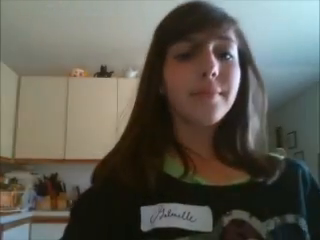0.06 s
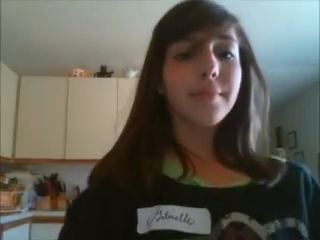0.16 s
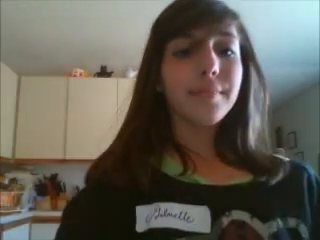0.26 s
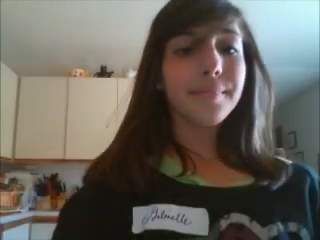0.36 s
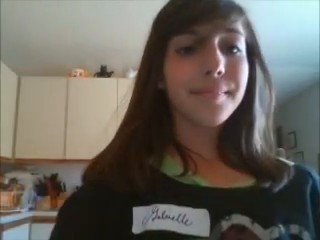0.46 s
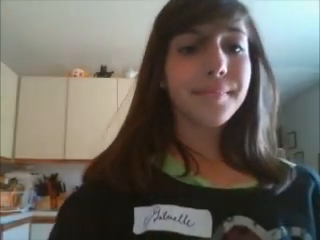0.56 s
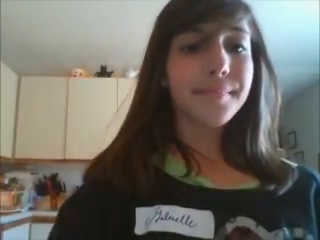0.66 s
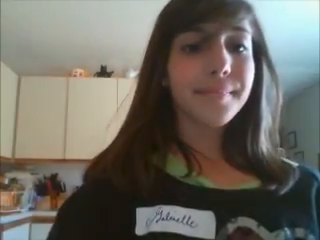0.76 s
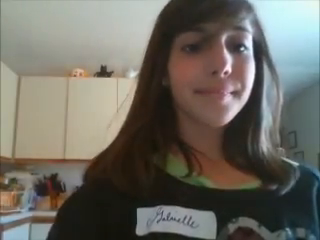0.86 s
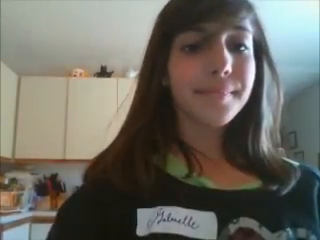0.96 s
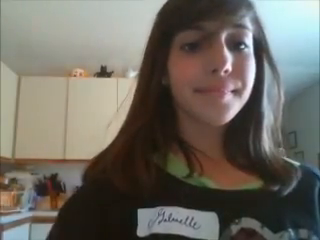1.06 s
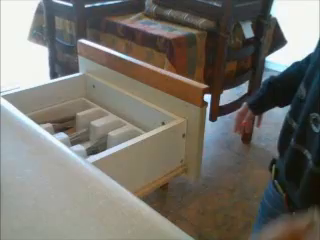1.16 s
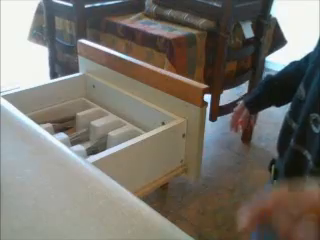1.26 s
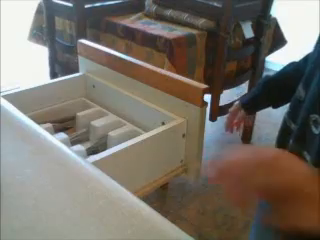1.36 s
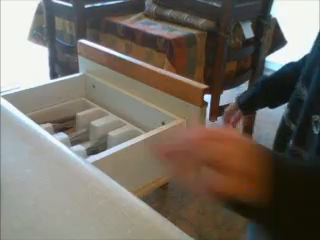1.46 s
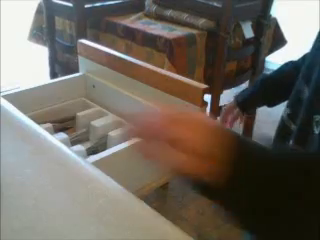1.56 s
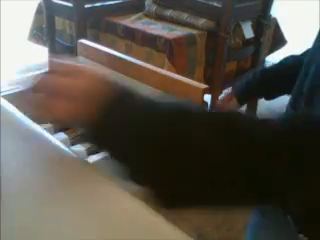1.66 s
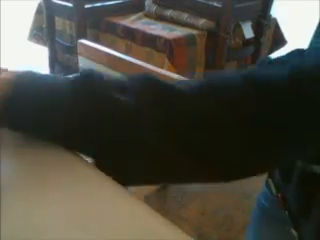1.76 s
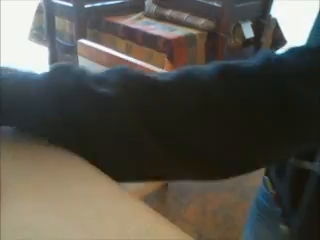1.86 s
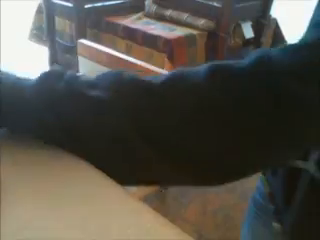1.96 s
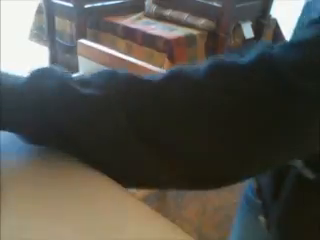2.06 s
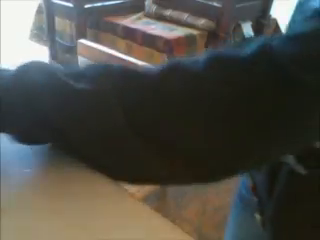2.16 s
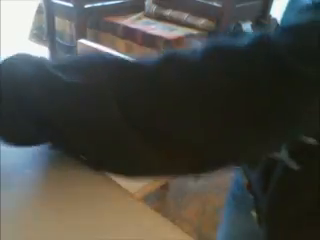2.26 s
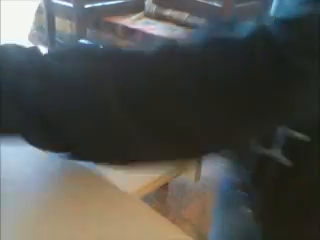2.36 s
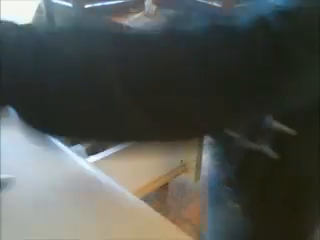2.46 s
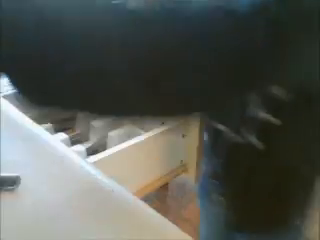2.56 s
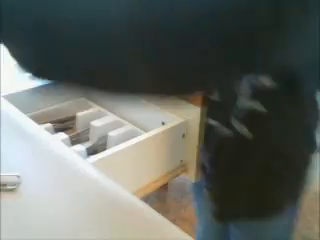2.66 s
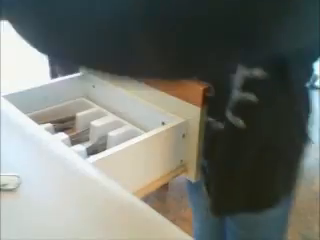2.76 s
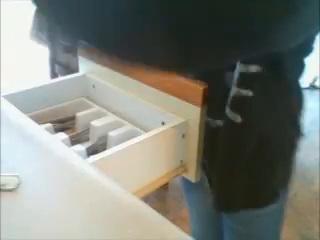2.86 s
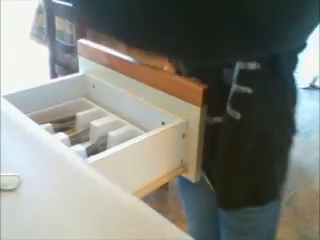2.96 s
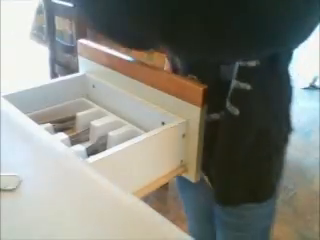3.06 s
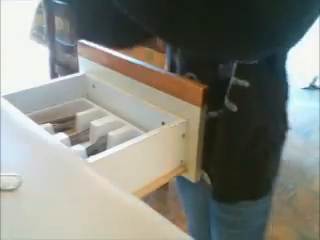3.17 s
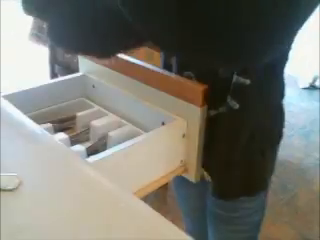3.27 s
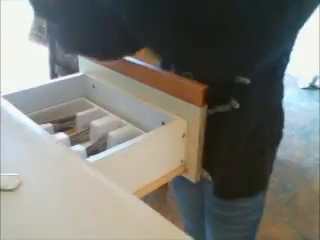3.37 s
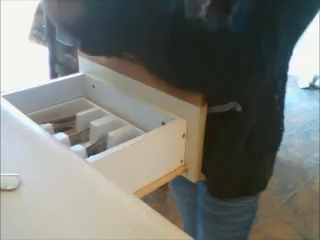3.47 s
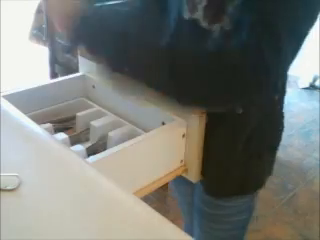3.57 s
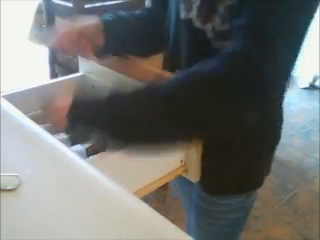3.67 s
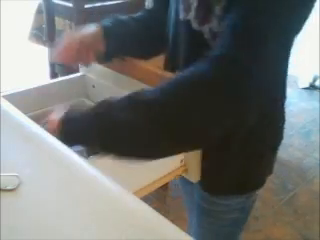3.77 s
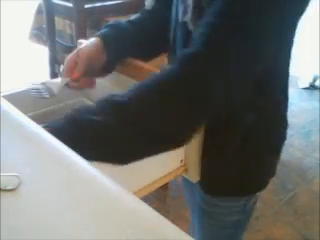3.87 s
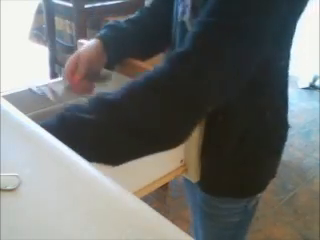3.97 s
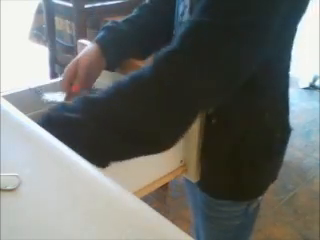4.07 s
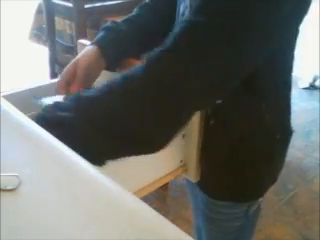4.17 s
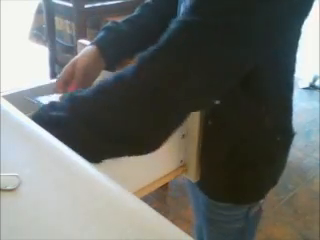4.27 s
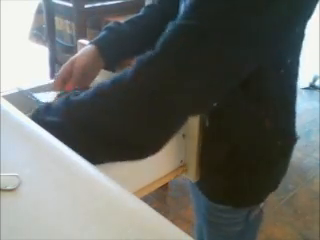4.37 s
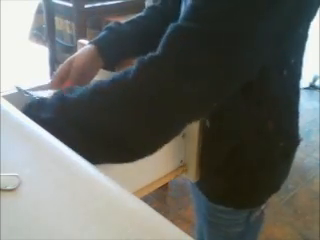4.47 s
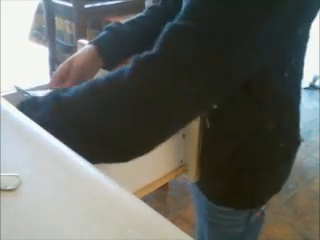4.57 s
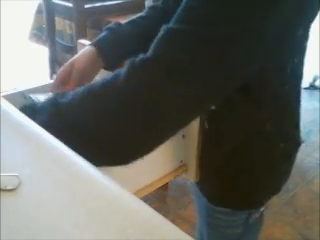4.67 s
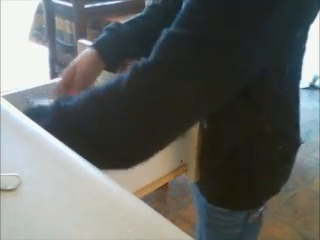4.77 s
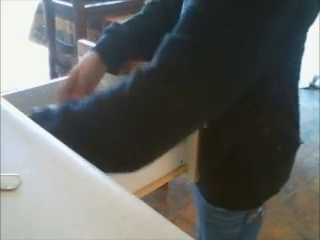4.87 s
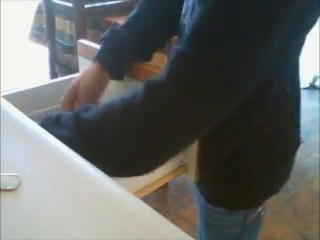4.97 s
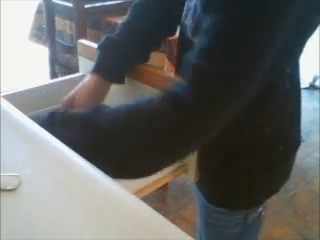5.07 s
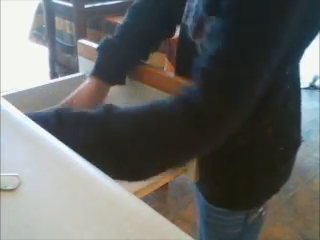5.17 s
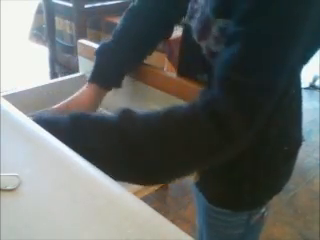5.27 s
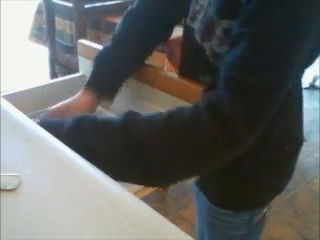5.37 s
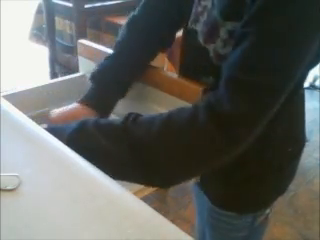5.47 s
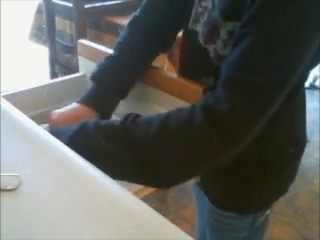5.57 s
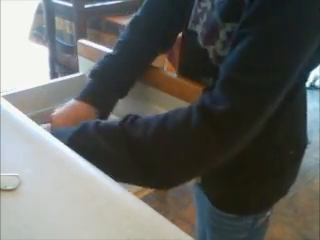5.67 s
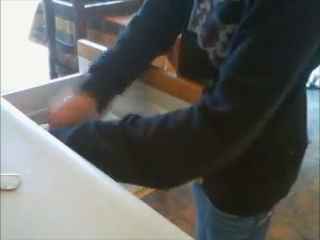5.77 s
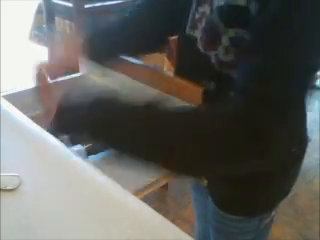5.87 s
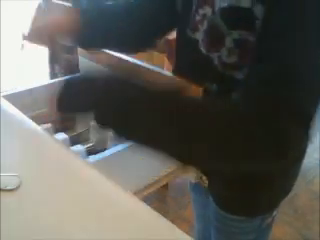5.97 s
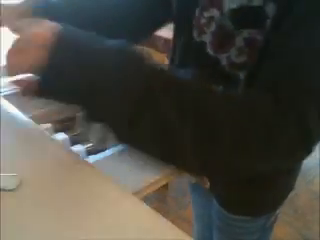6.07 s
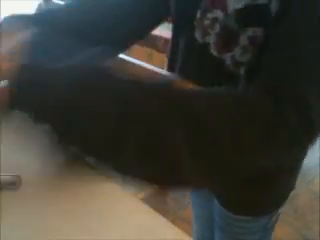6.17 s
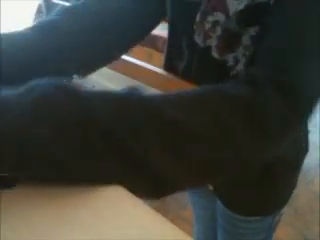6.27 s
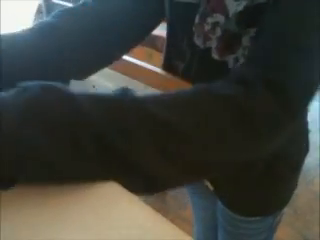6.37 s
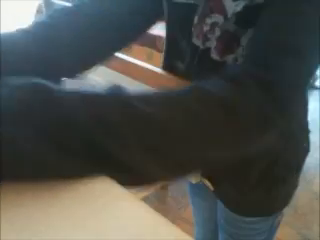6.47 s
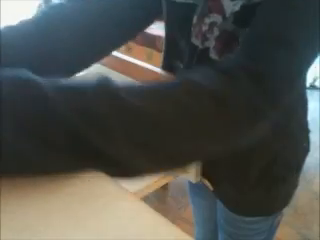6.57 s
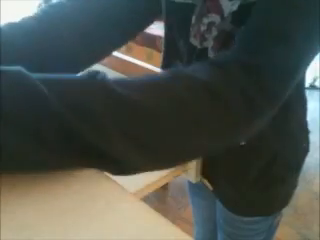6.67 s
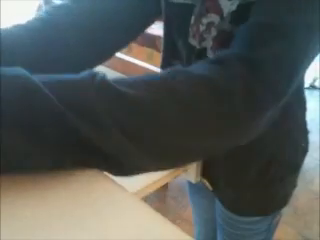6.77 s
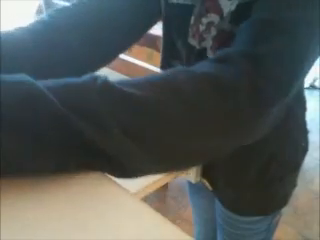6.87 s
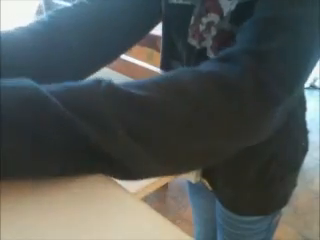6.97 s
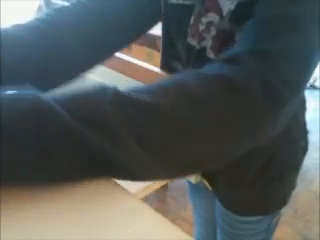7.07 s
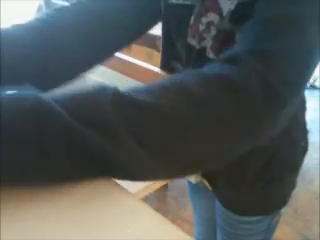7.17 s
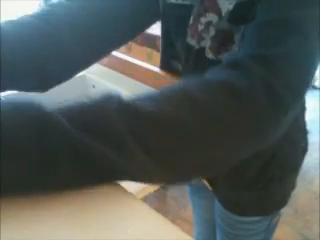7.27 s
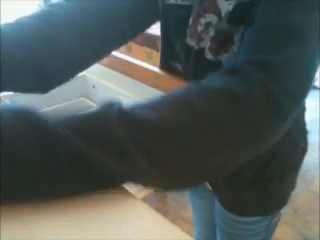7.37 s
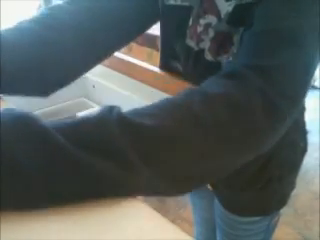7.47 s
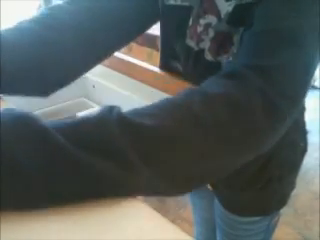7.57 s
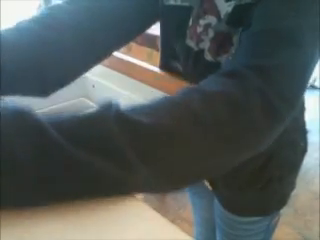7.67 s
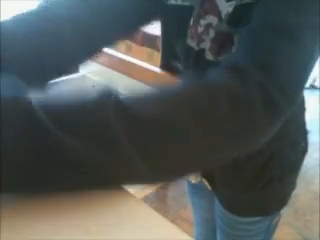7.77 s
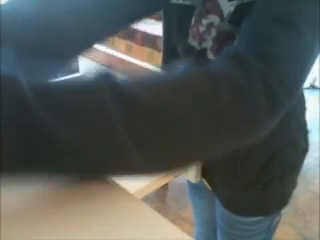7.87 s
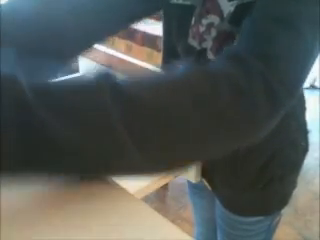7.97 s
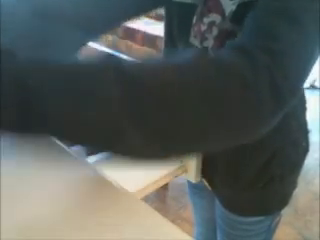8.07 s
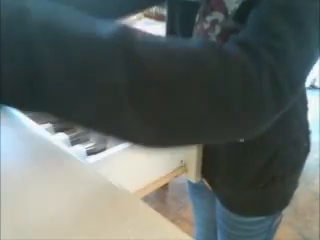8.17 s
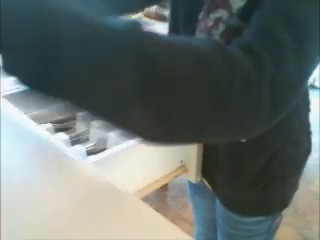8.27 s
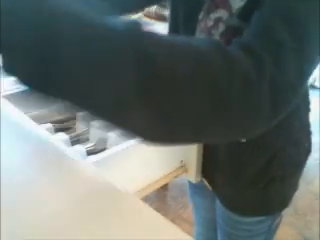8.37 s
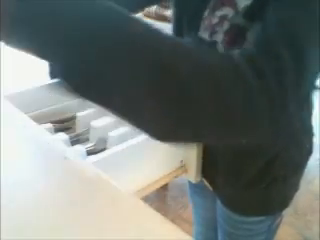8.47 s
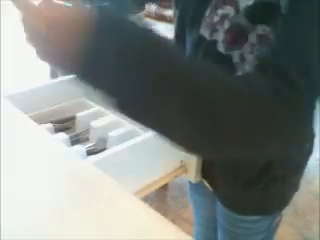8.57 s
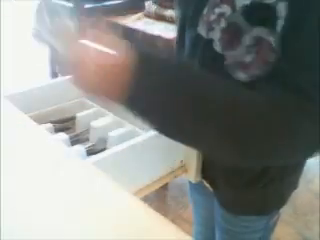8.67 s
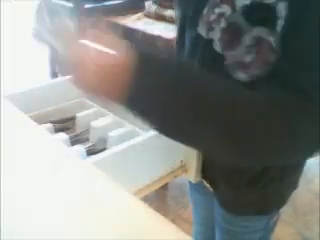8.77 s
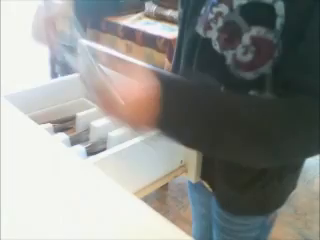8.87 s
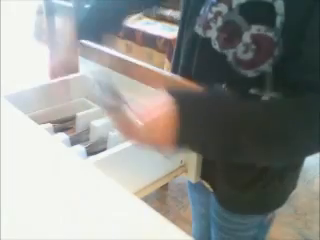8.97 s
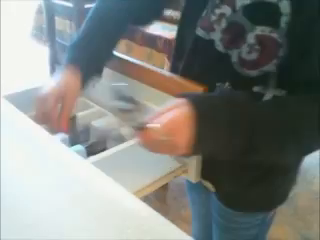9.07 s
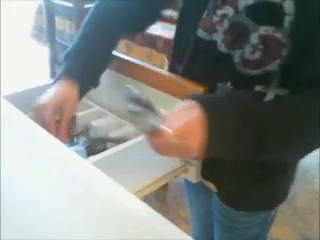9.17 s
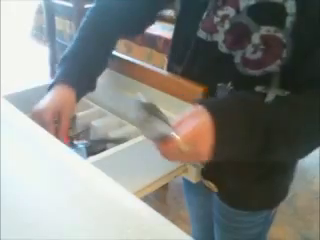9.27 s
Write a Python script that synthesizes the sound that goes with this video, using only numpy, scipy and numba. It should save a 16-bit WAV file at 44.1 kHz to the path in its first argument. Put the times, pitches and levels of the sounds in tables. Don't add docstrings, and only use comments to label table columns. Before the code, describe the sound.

Close, rough laptop microphone in a small, lightly echoing kitchen. Hum and faint hiss come first, then dry clicks and a bright burst of knives and forks striking the counter, overloaded at its peak. Duller hollow knocks follow as pieces are laid in the drawer, then a longer jangling gather on the counter, a pause, and final drawer taps.

```python
import sys
import numpy as np
from scipy import signal
from scipy.fft import rfft, irfft
from scipy.io import wavfile
from scipy.ndimage import uniform_filter1d
from numba import njit

SR = 44100
rng = np.random.default_rng(int(sys.argv[2]) if len(sys.argv) > 2 else 0)


def wav_out(sig):
    wavfile.write(sys.argv[1], SR, np.round(np.clip(np.atleast_2d(sig).T, -1, 1) * 32767).astype(np.int16))


def rack_gain(trim_db):
    fader = np.asarray(trim_db, float)
    return 10 ** (fader / 20)


N = 411453
TIME = np.arange(N) / SR


@njit
def ring(start_s, hz, t60_s, size, phase):
    out = np.zeros(N)
    for k in range(len(start_s)):
        step = np.exp(2j * np.pi * hz[k] / SR - np.log(1000) / (t60_s[k] * SR))
        z = size[k] * np.exp(1j * phase[k])
        first = int(start_s[k] * SR)
        for j in range(first, min(N, first + int(t60_s[k] * SR))):
            out[j] += z.imag
            z *= step
    return out


def ring_rows(rows):
    return ring(*np.ascontiguousarray(np.hstack(rows)))


def shape(table, hz):
    table_hz, table_db = np.transpose(table)
    return np.interp(np.log(hz), np.log(table_hz), table_db)


def noise(table):
    hz = np.maximum(np.fft.rfftfreq(N, 1 / SR), 1)
    gain = rack_gain(shape(table, hz)) * (hz > table[0][0])
    x = irfft(rfft(rng.standard_normal(N)) * gain, N)
    return x / x.std()


def walk(rate_hz):
    hold = int(SR / rate_hz)
    steps = np.repeat(rng.standard_normal(N // hold + 1), hold)
    return 1.3 * uniform_filter1d(uniform_filter1d(steps, hold), hold)[:N]


def drop(s, peak_s, rise_s, fall_s):
    late_s = s - peak_s[:, None]
    return 30 * np.maximum(-late_s / rise_s[:, None], late_s / fall_s[:, None])


def spray(s, db, hz, spread, cycles, least_t60, lo_hz, hi_hz, count, focus_db=12.0):
    a, b, c = rng.standard_normal((len(s), 3, count)).transpose(1, 0, 2)
    main = np.arange(count) == 0
    mode_hz = hz[:, None] * 2 ** (spread * a * ~main)
    size = rack_gain(db[:, None] + focus_db * main + 0.63 * b * ~main) / np.sqrt(count)
    size = size * (mode_hz > lo_hz) * (mode_hz < hi_hz)
    size = size * np.minimum(hz[:, None] / mode_hz, 1) ** 0.2
    start_s = s[:, None] + np.abs(b) / 2000
    t60_s = least_t60 + cycles / mode_hz
    phase = np.pi * (c > 0)
    return ring(start_s.ravel(), mode_hz.ravel(), t60_s.ravel(), size.ravel(), phase.ravel())


def slides():
    # (frequency [Hz], level [dB per Hz])
    wood_spectrum = [(88, -46), (150, -30.5), (227, -18), (327, -15.5), (425, -6), (589, -8.5),
                     (1000, -6.5), (1080, -4.5), (1500, -8.5), (1950, -20.5), (3300, -120)]
    clatter_spectrum = [(880, -33), (1500, -0.5), (1800, 11), (2380, 11), (2740, 10.5), (4300, 4.5),
                        (5590, -18.5), (9460, -120)]
    steel_spectrum = [(2530, -31), (4300, -4), (7640, 0.5), (8470, 2), (9700, -1.5), (10500, 2.5),
                      (14600, -6.5), (15700, -4)]
    slip_db = slips(rate_hz=110., fade_s=.006, depth=.33)
    wood = jostle(wood_spectrum, 1, slip_db, cycles=11.0, least_t60=0.015, scatter_db=0.5, count=15000)
    clatter = jostle(clatter_spectrum, 2, slip_db, cycles=16., least_t60=0.023, scatter_db=4.0, count=20000)
    grit = jostle(steel_spectrum, 3, slip_db, cycles=3.0, least_t60=0.00053, scatter_db=4.0, count=50000)
    glint = jostle(steel_spectrum, 3, slip_db, cycles=350.0, least_t60=0.041, scatter_db=4.0, count=9000)
    rubbed = rack_gain(-4.0) * surface(wood) + rack_gain(-2) * clatter
    return rubbed + rack_gain(-7.5) * grit + rack_gain(-6.5) * glint + singing()


def slips(rate_hz, fade_s, depth):
    jumps = rng.exponential(1, N) * (rng.random(N) < rate_hz / SR)
    force = signal.lfilter([1], [1, -np.exp(-1 / (fade_s * SR))], jumps) / (rate_hz * fade_s)
    return 10 * np.log10(1 - np.clip(depth, 0, .95) * (1 - force))


def effort(s, column):
    # (hardest [s], wood [dB], steel [dB], build-up [s], dying [s])
    first_handful = [(.2, -59.5, -62.5, 1.2, 1), (1.868, -25.5, -30, 0.042, 0.32),
                     (1.971, -23, -26.5, .01, 0.55), (2.032, -17, -17.5, 0.02, 0.62),
                     (2.32, -10, -9.5, 0.026, .15), (2.349, -7.5, -1.5, 0.049, 0.082),
                     (2.4, -15.5, -19.5, .05, 0.25), (2.546, -22.5, -29, 0.73, 0.081),
                     (2.666, -35, -53.5, .02, .08), (2.996, -52.5, -55, .11, 0.31),
                     (3.152, -51.5, -41.5, 0.0186, .15), (3.418, -46, -51, 0.35, 0.216)]
    second_handful = [(6.208, -21.5, -31, .012, 0.24), (6.448, -21, -23.5, 0.31, .2),
                      (6.69, -18, -17.5, 0.1, 0.077), (6.789, -28.5, -34, 0.051, 0.46),
                      (7.15, -17, -26, 0.073, 0.045), (7.348, -27, -22, 0.48, 0.042),
                      (7.43, -32, -45, 0.71, .4), (7.522, -16.5, -22.5, 0.004, 0.21),
                      (7.562, -16, -18.5, .11, 0.19), (7.821, -25, -16, 0.003, 0.07),
                      (7.883, -30, -23, .003, .045), (7.93, -24, -19, .005, 0.16),
                      (7.96, -24, -26, .02, .12), (8.024, -36, -32, .005, .1), (8.112, -44, -35, .005, .08),
                      (8.05, -30, -38, 0.32, 0.186), (8.29, -60, -40.5, 0.17, .3)]
    in_drawer = [(4.25, -45, -70, .3, .3), (4.314, -27.5, -31, 0.073, 0.23), (4.55, -34.5, -37.5, .6, 0.2),
                 (4.68, -30, -33.5, .008, .5), (4.788, -24, -22, 0.18, 0.21),
                 (5.008, -30.5, -39, 0.027, 0.19), (5.093, -24, -32, 0.043, 0.15),
                 (5.238, -31.5, -33.5, 0.018, 0.34), (5.558, -30, -29, 0.39, 0.42),
                 (5.686, -33, -35, 0.93, 0.16), (8.953, -24, -38.5, 0.0067, 0.2),
                 (9.088, -38.5, -50.5, 0.17, 0.22), (9.307, -24.5, -56.5, 0.014, 0.028)]
    on_counter = first_handful + second_handful
    peak_s, wood_db, steel_db, rise_s, fall_s = np.transpose(on_counter + in_drawer)
    clatter_offset_db = np.repeat([2, -5.5], [len(on_counter), len(in_drawer)])
    clatter_db = (wood_db + steel_db) / 2 + clatter_offset_db
    top_db, swing = [(wood_db, 1), (clatter_db, 1.245), (steel_db, 1.4)][column - 1]
    return np.max(top_db[:, None] - swing * drop(s, peak_s, rise_s, fall_s), axis=0)


def jostle(table, column, slip_db, cycles, least_t60, scatter_db, count):
    when, where, force, damp, phase = rng.random((count, 5)).T
    lo_hz, hi_hz = table[1][0], min(table[-2][0] * 1.097, 15900)
    hz = lo_hz * (hi_hz / lo_hz) ** where
    t60_s = (least_t60 + cycles / hz) * 2 ** (damp - .5)
    db = shape(table, hz) + 10 * np.log10(hz / t60_s) - scatter_db * np.log(1 - .98 * force)
    s = when * N / SR
    steady = np.sqrt(np.sum(rack_gain(2 * db) * t60_s) * SR / (4 * np.log(1000) * N))
    db = db + effort(s, column) + slip_db[(when * N).astype(int)]
    return ring(s, hz, t60_s, rack_gain(db) / steady, 2 * np.pi * phase)


def surface(wood):
    # (from [s], to [s])
    drawer_spans = [
        (4.1, 5.95),
        (8.8, 9.33),
    ]
    inside = sum((TIME > start) * (TIME < end) for start, end in drawer_spans)
    thin = signal.lfilter(*signal.butter(1, 330, "high", fs=SR), wood)
    counter_ring = rack_gain(-3) * signal.lfilter(*signal.iirpeak(1100, 7, SR), wood)
    drawer_ring = rack_gain(-1) * signal.lfilter(*signal.iirpeak(396, 4.5, SR), wood)
    return np.where(inside, wood + drawer_ring, thin + counter_ring)


def singing(count=60):
    # (frequency [Hz], level [dB]))
    sung = [
        (2.03, 2.13, [(3601, -38), (4678, -32), (8199, -39), (12812, -39), (13641, -42)]),
        (2.37, 2.53, [(3343, -31), (3580, -40), (4687, -33), (6611, -37), (7946, -44), (8683, -34), (9636, -41), (10481, -35), (11843, -32), (13324, -40), (14707, -38)]),
        (4.68, 4.95, [(8500, -52), (9475, -49), (9512, -49), (10078, -52), (12430, -47), (14034, -50)]),
        (5.47, 5.72, [(6449, -54), (8290, -52), (9728, -56), (10675, -52), (12952, -54), (14029, -57)]),
        (6.3, 6.74, [(5889, -57), (4900, -58), (8780, -53), (10788, -55), (12112, -57), (14131, -59), (14659, -63)]),
        (7.13, 7.4, [(9205, -49), (10029, -56), (10724, -51), (11956, -53), (13625, -59)]),
        (7.34, 7.44, [(2000, -37), (2370, -42)]),
        (4.49, 4.57, [(4950, -57), (5300, -60), (6600, -55)]),
        (5.24, 5.34, [(1560, -54), (3100, -57), (4100, -59)]),
    ]
    rows = []
    for start_s, end_s, lines in sung:
        for hz, db in lines:
            when, force, phase = rng.random((count, 3)).T
            s = start_s + (end_s - start_s) * when
            push = rack_gain(.6 * effort(s, column=3) - 4 * np.log(1 - .98 * force))
            push = push / np.sqrt(np.mean(push ** 2))
            size = rack_gain(db + 9) * np.sqrt(end_s - start_s) * push
            t60_s = 0.059 + 250 / hz + 0 * s
            rows.append([s, hz + 22 * (phase - .5), t60_s, size, 2 * np.pi * phase])
    return ring_rows(rows)


def knocks():
    # (time [s], peak [dB], steel [dB], steel pitch [Hz])
    drawer_box = [(3.157, -41, -29.5, 9740), (3.923, -38, -38, 7880), (4.295, -21, -29, 9830),
                  (4.753, -5, -24, 13900), (4.786, -14, -24, 9750), (5.233, -21.5, -36.5, 6350),
                  (5.534, -12.5, -33, 8280), (8.951, -14, -27.5, 6630)]
    divider = [(2.667, -19.5, -59.5, 7810), (4.24, -24, -62, 6970), (4.313, -16.5, -32, 10800),
               (5.003, -20, -44, 7570), (5.475, -22, -37, 7290), (5.503, -19.5, -36.5, 12880),
               (5.556, -14, -33.5, 8340), (5.644, -19.5, -33.5, 9280), (7.047, -24.5, -33, 7300)]
    tray_floor = [(4.677, -19.5, -44, 6300), (5.0845, -11, -45, 7090), (5.599, -15, -36, 8350),
                  (6.951, -24.5, -29.5, 4060), (7.666, -17, -26.5, 12200), (7.822, -13, -29, 10140),
                  (9.0435, -16, -43, 5910)]
    counter = [(1.859, -21, -24.5, 8780), (1.965, -17, -21.5, 10260), (2.244, -13, -22, 8200),
               (2.316, -16.5, -11.5, 4070), (2.334, -2, -11.5, 5503), (2.462, 3, -28.5, 11970),
               (4.454, -23, -39.5, 10690), (5.4, -25, -48.5, 9330), (6.197, -34, -28.5, 6554),
               (6.205, -12.5, -28.5, 4660), (6.421, -28, -33, 4210), (6.652, -13, -33, 8450),
               (6.781, -17, -20, 4400), (6.822, -11, -26, 4050), (6.859, -37, -31, 6870),
               (7.144, -17.5, -24, 5080), (7.292, -10, -24.5, 9430), (7.549, -5, -49, 8580),
               (7.882, -19, -28, 11000), (7.928, -28.5, -25.5, 5740), (9.305, -22.5, -53, 4200)]
    handle = [(1.827, -26, -48, 9250), (8.563, -36.5, -57, 6800), (2.986, -32, -48.5, 9720),
              (3.264, -36, -38.5, 6400), (5.002, -25, -38.5, 7560), (7.235, -11.5, -31, 4310),
              (7.339, -2, -34, 4250)]
    blade = [(2.027, -3, -25, 4900), (2.136, -2, -18.5, 8140), (3.294, -29.5, -34.5, 8400),
             (7.515, -6, -33, 4400), (8.021, -22.5, -30, 7840), (5.568, -23, -50, 4400),
             (8.11, -35, -33, 8400)]
    # (time [s], peak [dB], body pitch [Hz], steel [dB], steel pitch [Hz])
    clash = [
        (2.339, 8, 1090, -1, 5420),
        (2.348, 8, 2700, -1, 5420),
        (2.357, 7, 1190, -3, 8680),
    ]
    struck = [(drawer_box, 415), (divider, 765), (tray_floor, 935),
              (counter, 1090), (handle, 2270), (blade, 2800)]
    rows = [(s, db, hz, steel_db, steel_hz) for table, hz in struck for s, db, steel_db, steel_hz in table]
    s, db, body_hz, steel_db, steel_hz = np.transpose(rows + clash)
    crack = spray(s, db - 7.5, 1.5 * body_hz, spread=1.2, cycles=4.2, least_t60=0.0042,
                  lo_hz=427, hi_hz=14850, count=20)
    body = spray(s, db - 8.0, body_hz, spread=.8, cycles=1.8, least_t60=0.069,
                 lo_hz=344.3, hi_hz=4390, count=90, focus_db=16)
    steel = spray(s, steel_db + 3.0, steel_hz, spread=0.8, cycles=18.0, least_t60=0.05,
                  lo_hz=4070, hi_hz=15600, count=60, focus_db=12.5)
    return crack + body + steel


def handfuls():
    # (frequency [Hz], level [dB], t60 [s])
    dropped = [(3343, -2, .45), (7946, -10, 1.1), (9636, -14, .7), (11843, -6, .32), (15560, -18, .5)]
    gathered = [(4400, -2, 0.2), (8199, 0, 0.16)]
    stacked = [(6498, -22, 0.5), (7709, 0, 0.088), (8635, -17, 0.27), (10670, -21, 0.45),
               (11620, -17, 0.26), (12100, -22, 0.54), (14220, -12, 0.13)]
    lifted = [(4996, -10, 0.3), (6519, -5, 0.2), (8436, -5, 0.3), (9141, -7, 0.13), (10490, -15, 0.25),
              (10640, 2, 0.16), (11620, -28, 0.45), (12490, -21, 0.25), (13530, -17, 0.15),
              (14270, -4, 0.17)]
    # (time [s], level [dB])
    blows = [
        [(2.36, -24), (2.41, -26), (2.462, -30)],
        [(2.152, -18), (2.245, -34)],
        [(7.53, -32), (7.565, -32), (7.667, -40)],
        [(7.822, -45), (7.929, -25), (7.955, -32), (8.022, -44)],
    ]
    rows = []
    for modes, handful_blows in zip((dropped, gathered, stacked, lifted), blows):
        hz, db, t60_s = np.transpose(modes)
        for s, blow_db in handful_blows:
            a, b = rng.standard_normal((2, len(hz)))
            size = rack_gain(db + blow_db + 1.5 * a)
            rows.append([s + 0 * hz, hz * (1 + b / 2000), t60_s, size, 3 * b])
    return ring_rows(rows)


def taps():
    # (time [s], peak [dB], pitch [Hz])
    tap_events = [(1.998, -14.5, 2250), (2.056, -8, 1100), (2.095, -8.5, 1150), (2.218, -13, 1070),
                  (2.297, -12.5, 1140), (2.39, -6, 2900), (2.42, -8, 3000), (2.497, -7, 2600),
                  (2.53, -12, 2900), (4.534, -27, 945), (4.561, -25, 960), (4.586, -25, 431),
                  (4.7, -23, 748), (4.73, -18.5, 1223), (5.448, -28, 401), (5.716, -27, 423),
                  (6.301, -21, 1080), (6.318, -21, 1540), (6.331, -19, 1110), (6.365, -17, 1140),
                  (6.403, -13, 2090), (6.421, -8, 2890), (6.44, -16, 1100), (6.482, -10, 1083),
                  (6.642, -19.5, 1140), (6.675, -13, 1130), (6.684, -9.5, 1920), (7.366, -18, 2220),
                  (7.508, -22, 1120), (7.531, -8, 1130), (7.561, 1, 1400), (7.57, -7, 2724),
                  (7.588, -6, 2600), (7.601, -5, 1300), (7.958, -13, 2010), (9.075, -25, 1850),
                  (9.11, -27.5, 1300)]
    s, db, hz = np.transpose(tap_events)
    return spray(s, db - 6.0, hz, spread=1.1, cycles=6.0, least_t60=0.03,
                 lo_hz=326, hi_hz=12000, count=40, focus_db=15)


def landings(count=7):
    # (frequency [Hz], width [Hz], level [dB])
    front_slot = [(400, 31, -2.5), (957, 28, -3), (1850, 37, -17.5), (2610, 29, -23), (3050, 30, -22.5),
                  (3670, 44, -22.5)]
    spoon_slot = [(908, 88, 0), (1850, 30, -3), (2280, 51, -11.5), (2720, 39, -17), (3140, 56, -18),
                  (3870, 44, -19.5)]
    fork_slot = [(398, 25, -3.5), (533, 31, -5), (726, 32, -0.5), (1130, 51, -2), (1850, 24, -11),
                 (2250, 34, -0.5)]
    knife_slot = [(378, 28, 0.5), (734, 52, -6), (997, 89, -3.5), (1233, 41, -5), (1577, 26, -8),
                  (2394, 99, -13.5), (3420, 25, -18)]
    back_slot = [(400, 35, -9), (748, 41, -1), (1020, 27, -1), (1150, 15, -6), (1325, 15, -4.5),
                 (2446, 28, -16)]
    counter_edge = [(1100, 34, -1), (2260, 57, -2.5), (2480, 37, -5.5), (2960, 22, -1.5), (3750, 53, -10),
                    (4730, 27, -14)]
    counter_middle = [(1140, 15, -10), (1540, 19, -10), (2280, 15, -4), (2520, 22, -4), (2680, 15, 0),
                      (4390, 46, -7.5)]
    # (time [s], peak [dB], t60 [s], spot)
    landed = [(8.951, -20, .11, front_slot), (9.0435, -20.5, 0.06, spoon_slot),
              (5.002, -21, 0.073, fork_slot), (5.0845, -20, .12, knife_slot),
              (4.313, -18.5, 0.081, back_slot), (2.027, -10, .07, counter_edge),
              (2.136, -11.5, 0.054, counter_middle)]
    rows = []
    for s, db, t60_s, spot in landed:
        hz, width_hz, mode_db = np.repeat(spot, count, axis=0).T
        off, late, phase = rng.random((len(hz), 3)).T
        start_s = s + .006 * late ** 3
        mode_hz = hz + (width_hz + .12 * hz) * (2 * off - 1) ** 3
        size = rack_gain(db + mode_db - 4.5)
        rows.append([start_s, mode_hz, t60_s * (800 / hz) ** .3, size, np.pi * (phase > .5)])
    return ring_rows(rows)


def scrape(count=120):
    start_s, end_s, from_hz, to_hz, db = 8.21, 8.34, 3950, 4700, -57
    when, off, phase = rng.random((count, 3)).T
    hz = (from_hz + (to_hz - from_hz) * when) * (1 + 0.18 * (off - .5))
    size = rack_gain(db + 4.8 * np.sin(np.pi * when))
    return ring(start_s + (end_s - start_s) * when, hz, 0.027 + 0 * hz, size, 2 * np.pi * phase)


def kitchen(x):
    t = TIME[:SR // 2 + SR // 4]
    soft = noise([(100, 1.0), (2500, -2.5), (5000, -10.5), (16000, -28)])[:len(t)]
    bright = noise([(2500, -24), (5000, 9.0), (16000, -11.5)])[:len(t)]
    tail = soft * rack_gain(-60 * t / 0.42) + 0.83 * bright * rack_gain(-60 * t / 0.36)
    tail = tail * np.clip(t / 0.015, 0, 1)
    return rack_gain(-14.5) * signal.fftconvolve(x, tail / np.sqrt(np.sum(tail ** 2)))[:N]


def keys():
    # (time [s], peak [dB], pitch [Hz])
    key_events = [
        (0.926, -40.5, 1280),
        (0.951, -23, 1945),
        (1.131, -19, 672),
    ]
    s, db, hz = np.transpose(key_events)
    return spray(s, db, hz, spread=1.4, cycles=22.0, least_t60=0.011,
                 lo_hz=250, hi_hz=12000, count=90, focus_db=20)


def thuds():
    # (time [s], peak [dB], pitch [Hz])
    thud_events = [(0.069, -10.5, 40), (0.912, -25, 122), (1.051, -26, 112), (1.154, -21, 154),
                   (2.007, -26, 109), (2.341, -20, 68.2), (5.088, -17, 257), (6.19, -22, 103),
                   (6.331, -22.5, 104), (6.497, -20, 101), (6.647, -23, 104), (7.33, -27.5, 101),
                   (8.718, -26.5, 105)]
    s, db, hz = np.transpose(thud_events)
    blows = spray(s, db - 8, hz, spread=.5, cycles=4.5, least_t60=.05, lo_hz=25, hi_hz=400, count=4)
    return uniform_filter1d(uniform_filter1d(blows, size=70), size=70)


def bumps():
    # (time [s], level [dB], build-up [s per 30 dB], dying [s per 30 dB])
    bump_events = [
        (.1, -34, 0.18, 1.4),
        (1.17, -35.5, 1, 0.3),
        (2.73, -37, .17, 1),
        (3.842, -38.5, 0.63, 0.5),
        (4.83, -33, 1, 0.4),
        (5.19, -37, .18, 3.1),
        (8.68, -40.5, .4, 2.5),
    ]
    t = TIME[::100]
    s, db, rise_s, fall_s = np.transpose(bump_events)
    sway_db = np.max(db[:, None] - drop(t, s, rise_s, fall_s), axis=0)
    dull_db = np.max([sway_db - 11, effort(t, column=1) - 16.5, -54 + 0 * t], axis=0)
    deep = noise([(14, -0.5), (26, -0.5), (42, -8.5), (60, -18), (150, -69.0)])
    dull = noise([(50, -17.5), (85, 0.5), (180, -2.0), (300, -12.5), (700, -57.5)])
    deep = deep * rack_gain(np.interp(TIME, t, np.maximum(sway_db, -51)))
    return deep + dull * rack_gain(np.interp(TIME, t, dull_db))


def fridge():
    # (time [s], level [dB])
    hum_curve = [(0.0, -32), (0.15, -35), (0.62, -45), (1.01, -34.5), (9.33, -33.5)]
    curve_s, curve_db = np.transpose(hum_curve)
    hum_db = np.interp(TIME, curve_s, curve_db, -120, -120) - 7.0 + 0.53 * walk(9)
    return rack_gain(hum_db) * np.sin(2 * np.pi * 59.2 * TIME + 0.2 * walk(4.5))


def electronics():
    # (frequency [Hz], level [dB])
    whine_spectrum = [(5200, -77), (5900, -82.5), (6500, -71.5), (7100, -70), (7500, -76.5), (7800, -84),
                      (8600, -92.5)]
    lines_hz = 249.37 * np.arange(21, 35)
    whine = sum(rack_gain(shape(whine_spectrum, hz) + 2) * np.sin(2 * np.pi * hz * TIME) for hz in lines_hz)
    return whine * (TIME > 1.165)


def air():
    # (frequency [Hz], level [dB per Hz])
    air_spectrum = [(41, -30), (70, -25), (113, -31), (327, -11.5), (480, -11.5), (827, -16), (4520, -28.5),
                    (14700, -32.5), (15700, -38.5)]
    return rack_gain(-51.5 + .6 * walk(3)) * noise(air_spectrum)


def scene():
    struck = knocks() + handfuls() + scrape() + landings() + taps()
    struck = signal.sosfilt(signal.butter(3, 260, "high", fs=SR, output="sos"), struck)
    cutlery = slides() + struck
    background = bumps() + fridge() + electronics() + air()
    mono = cutlery + kitchen(cutlery) + keys() + thuds() + background
    side = rack_gain(-37.5) * np.roll(mono, SR // 200) * walk(40)
    return np.array([mono + side, mono - side])


def band_limit(x):
    return signal.sosfilt(signal.butter(12, 15870, fs=SR, output="sos"), x)


def record(dry):
    mix = np.clip(dry, -.98, .98)
    return band_limit(mix)


dry = scene()
out = record(dry)
wav_out(out)
```